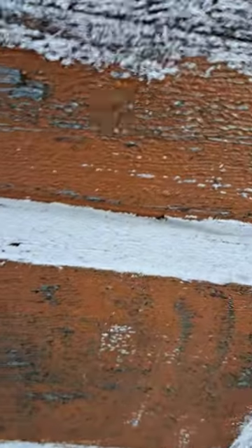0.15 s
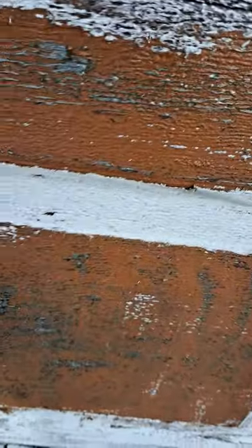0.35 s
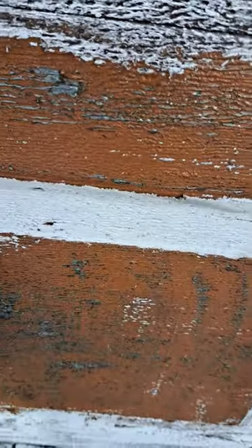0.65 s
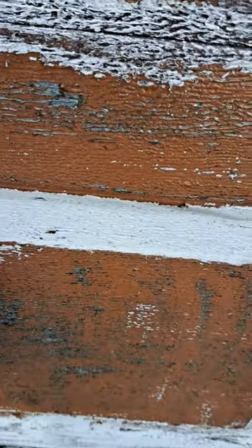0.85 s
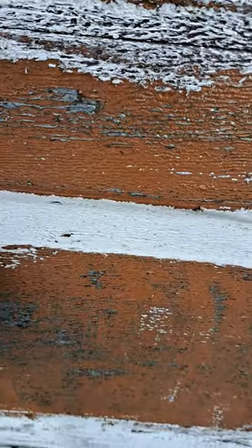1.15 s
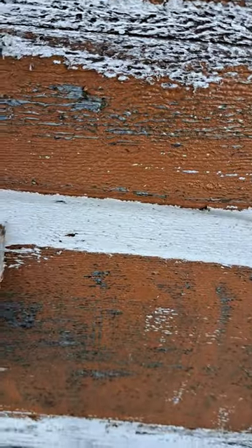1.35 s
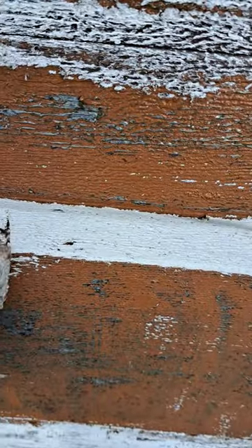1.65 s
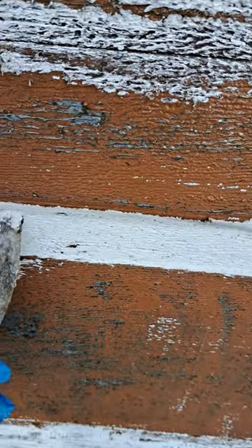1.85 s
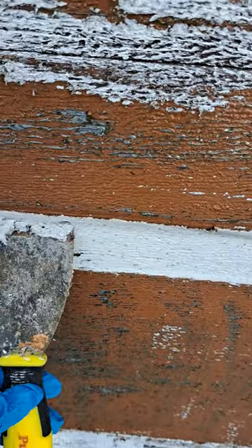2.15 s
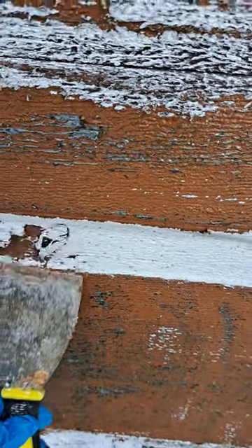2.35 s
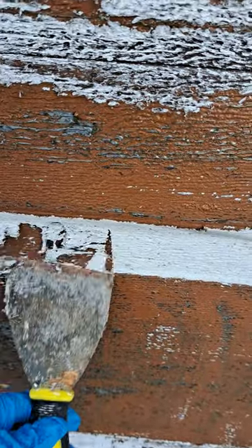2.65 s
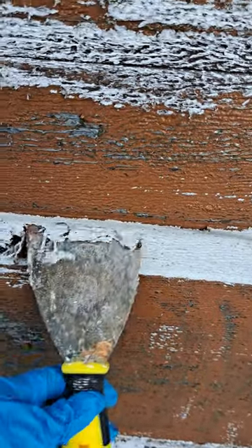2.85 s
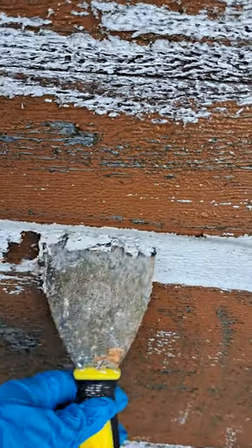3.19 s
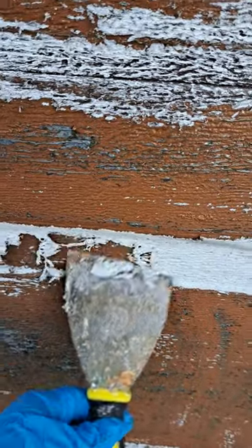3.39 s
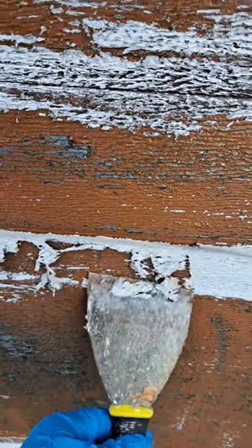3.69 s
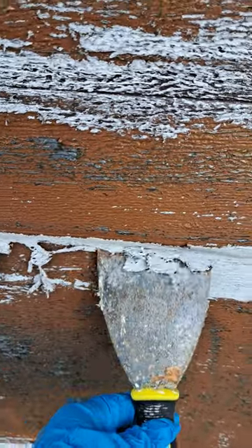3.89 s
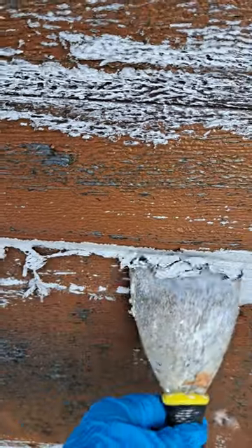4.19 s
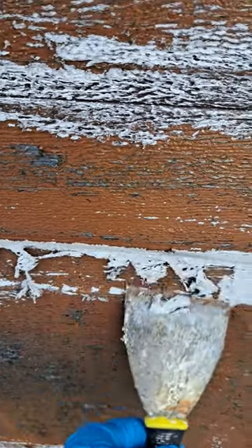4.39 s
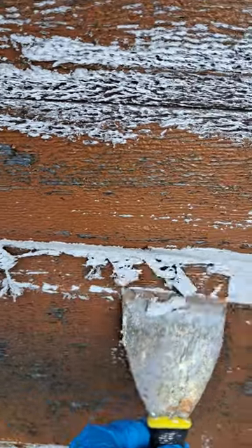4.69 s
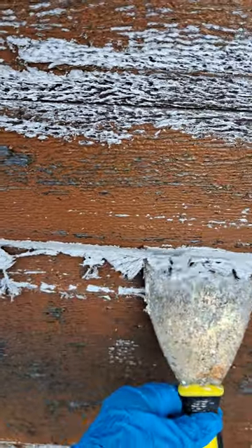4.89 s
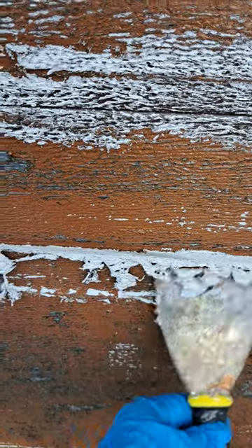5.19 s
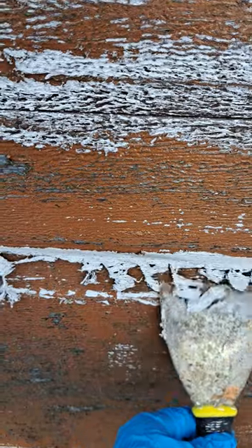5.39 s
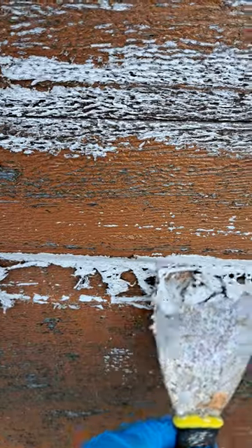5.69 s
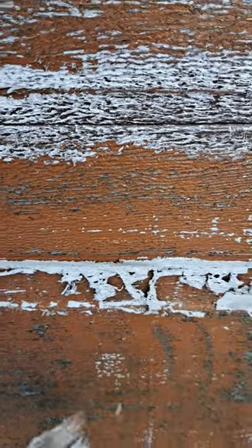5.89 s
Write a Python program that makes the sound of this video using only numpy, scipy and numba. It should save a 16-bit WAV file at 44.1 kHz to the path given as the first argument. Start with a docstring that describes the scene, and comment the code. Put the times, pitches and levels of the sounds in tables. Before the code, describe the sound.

Close scraping of dry flaking paint from a wooden door: short gritty pushes with hollow woody knocks, sharp cracks and faint metallic ring, over quiet outdoor hush.

```python
"""Scraping paint from a wooden door

A steel scraper, pushed in short strokes over flaking paint, is heard close to a two-port microphone.
Stick-slip clicks and knocks excite the damped modes of door panel and blade; the blade also sings faintly.
Grit, cracking flakes and tiny ticks are shaped noise; nearby walls return a short scatter of echoes.
Low noise swells after each push as a rumble, and a wavering noise forms the quiet outdoor hush."""
import sys
import numpy as np
from scipy import signal
from scipy.fft import rfft, irfft, next_fast_len
from scipy.io import wavfile
from scipy.ndimage import uniform_filter1d
from numba import njit

SR = 44100
rng = np.random.default_rng(int(sys.argv[2]) if len(sys.argv) > 2 else 0)


def bounce(signal):
    """Save signal as a 16-bit WAV file at the path given by the first command-line argument."""
    frames = np.transpose(np.atleast_2d(signal))
    limited = np.clip(frames, -1, 1)
    pcm = np.round(limited * 32767).astype(np.int16)
    wavfile.write(sys.argv[1], SR, pcm)


def elevation(decibels):
    """Turn decibel levels (scalar or array-like) into linear amplitude ratios."""
    levels = np.asarray(decibels, float)
    return 10 ** (levels / 20)


N = 266364   # length in samples

# Hush spectrum, relative density: f/Hz, level/dB (per Hz)
HUSH_SPECTRUM = [(24, 16), (40, 14), (124, -20), (293, -35), (510, -19), (1330, -20.5), (2090, -17),
                 (2900, -21), (6000, -23), (12800, -25), (15300, -24), (16500, -69)]
# Hush level in its 2.5-9 kHz band, before wavering: t/s, level/dB
HUSH_LEVEL = [(0.0, -58.5), (0.4, -55.5), (1.0, -53), (1.3, -44.5), (1.62, -55.5), (1.95, -48.5),
              (2.6, -56.5), (4.2, -57.5), (4.8, -51), (6.04, -52.5)]
# Rumble spectrum, relative density: f/Hz, level/dB (per Hz)
RUMBLE_SPECTRUM = [(13, -21), (24, 0), (54, 12.5), (86, 9), (124, 15), (172, 5), (250, 2), (320, -27),
                   (550, -120)]
# Rumble level, before the swell after each push: t/s, level/dB
RUMBLE_LEVEL = [(0.0, -50), (0.29, -64), (0.31, -36.5), (0.39, -47), (0.45, -25), (0.565, -36), (0.6, -30),
                (0.77, -25), (0.83, -41), (0.87, -80), (0.91, -25.5), (1.38, -41.5), (1.5, -25.5),
                (1.61, -51), (1.68, -33.5), (1.98, -38.5), (2.1, -61), (2.2, -27.5), (2.42, -72),
                (2.62, -42.5), (3.3, -29.5), (3.7, -29.5), (4.3, -33), (4.9, -23), (5.1, -34), (5.6, -35.5),
                (5.85, -32), (6.04, -50)]
SHAKE_DB, SHAKE_S = 7.5, 0.037   # swell of the rumble, and its delay after the stop of a push

TICKS_PER_S, TICK_DB = 20, -44   # mean rate and smallest size of the crumb ticks
# Faint rising blade notes, mostly between pushes, one in the last push:
# start t/s, length/s, starting f/Hz, rms level/dB
SINGING_NOTES = [(3.298, 0.084, 990, -47.5), (4.326, .055, 978, -50), (4.38, 0.053, 1160, -46.5),
                 (6.017, .03, 790, -36)]
SINGING_RISE_HZ_PER_S, SINGING_T60_S = 1000, 0.085
# Dry flakes: t/s, relative level/dB, main t60/s, left-right level/dB, centre f/Hz
FLAKES = [(0.1096, -15, 0.092, -8.5, 8800), (0.576, -28, 0.26, 1, 2500), (0.6986, -18.5, 0.015, -8, 6600),
          (0.771, -33, 0.028, -24, 3000), (0.9678, -6.5, 0.055, -7, 3370),
          (1.557, -24.5, 0.093, -2.5, 2500), (1.7398, -10, 0.053, -5, 3330), (1.827, -8, 0.023, -8, 3000),
          (2.025, -11.5, 0.019, -7, 3070), (2.126, -21.5, 0.042, -14, 3900),
          (2.186, -11, 0.056, -12.5, 4200), (2.396, -19.5, 0.061, -5, 2470), (2.528, -13, 0.049, -3, 3480),
          (2.842, -15, 0.083, 2, 5000), (2.858, -9.5, 0.03, 10, 2700), (3.162, -12.5, 0.06, 2, 4030),
          (3.174, -6.5, 0.03, 1, 3000), (3.6674, 9, 0.02, -1.5, 7570), (3.891, -23, 0.025, -15, 3000),
          (4.063, -25.5, 0.11, -3, 2520), (4.255, -12, 0.03, 3, 4200), (4.587, -11.5, 0.038, -5, 4130),
          (4.918, -18, 0.057, 8, 4160), (4.958, -28, 0.033, -27.5, 2600), (5.068, -24.5, 0.016, -9, 6360),
          (5.2956, 3.5, 0.017, -1, 2550), (5.3556, -19, 0.013, -14, 2420), (5.591, -2.5, 0.04, -4, 5170),
          (5.7305, -10.5, 0.06, -13, 5800), (5.7534, -7, 0.06, -3.5, 4270), (5.8443, -10, 0.059, -8, 3580)]
# Grit spectrum, relative density: f/Hz, level/dB (per Hz)
GRIT_SPECTRUM = [(1180, -24), (2000, -3), (2950, -16), (3220, -12), (4710, -14.5), (7520, -18),
                 (12500, -20), (15400, -17), (16100, -7), (16500, -46)]
GRIT_LEAN_DB = (2.5, -5.5, -1.4)   # left-right level of low, middle and high crumbs

# Forward pushes: stop t/s, length/s, then panel, blade and grit level/dB reached at the stop
PUSH_STROKES = [(1.087, 0.041, -18.5, -30, -36), (1.237, 0.021, -21, -50, -70),
                (1.778, 0.1, -24.5, -36, -40.5), (1.837, 0.03, -19, -27, -31.5),
                (2.195, 0.1, -23.5, -30.5, -38.5), (2.558, 0.13, -19.5, -33, -32.5),
                (2.862, 0.057, -16, -25.5, -33.5), (3.187, 0.049, -16.5, -21.5, -30.5),
                (3.472, 0.025, -25.5, -28.5, -38.5), (3.528, 0.033, -17, -14.5, -27),
                (3.899, 0.047, -14, -21.5, -28.5), (4.266, 0.074, -16, -20.5, -27.5),
                (4.59, 0.087, -17, -28.5, -31.5), (4.91, 0.061, -21, -27, -30),
                (5.299, 0.066, -15.5, -25, -33.5), (5.542, 0.096, -20, -42, -39.5),
                (5.596, 0.045, -19, -21.5, -34.5), (5.863, 0.14, -16, -22, -35.5),
                (6.03, 0.082, -21.5, -41, -46.5)]
BUILD_DB_PER_S = (154, 164, 133)   # growth during a push: panel, blade, grit
ONSET_DB_PER_S, RELEASE_DB_PER_S = (907.5, 913, 911), (298, 705, 810)   # before its start, after its stop
# Lighter drags: start t/s, length/s, then panel, blade and grit level/dB
PULL_STROKES = [(0.235, .05, -48.5, -71, -76), (0.44, 0.59, -70.5, -60, -57),
                (1.427, 0.061, -27, -42.5, -40), (1.993, 0.02, -32.5, -40, -45),
                (2.372, 0.011, -38, -52, -53), (2.625, 0.1, -34, -59, -50.5),
                (3.018, 0.0084, -30, -45, -43), (3.302, 0.077, -33.5, -44, -48),
                (3.69, 0.017, -37, -73, -45.5), (4.052, 0.032, -34, -46, -45.5),
                (4.416, 0.01, -30, -45.5, -41.5), (4.737, 0.013, -29, -38, -40),
                (5.136, 0.01, -32, -40.5, -46.5)]
PULL_RISE_DB_PER_S, PULL_FALL_DB_PER_S = (186, 226, 241), (322, 285, 329)
# Edge resting lightly between strokes: t/s, panel level/dB
RESTING = [(0.0, -59), (0.9, -54), (1.3, -48), (1.62, -54.5), (2.0, -45), (2.6, -48.5), (3.5, -41),
           (3.8, -49), (4.2, -40.5), (5.0, -50.5), (6.04, -51.5)]
REST_BLADE_DB, REST_GRIT_DB = -7.5, -30   # against the panel

# Edge knocks on wood: t/s, relative strength/dB, blade share/dB, favoured panel f/Hz
EDGE_KNOCKS = [(0.301, -20.5, -46, 107), (0.433, -28, -35, 123), (0.576, -21.5, -22, 111),
               (0.697, -27, -34, 150), (0.753, -25.5, -37, 164), (0.902, -8.5, -42, 136),
               (0.914, -8, -35, 165), (1.047, -11.5, -28, 208), (1.065, -12, -23, 260),
               (1.078, -9.5, -18, 287), (1.206, -5, -28, 156), (1.221, -5, -33, 169.5),
               (1.824, -1.5, -6, 384), (2.122, -20.5, 3, 540), (2.183, 1.5, -8.5, 320),
               (2.344, -22.5, -16, 270), (2.397, -15.5, -5.5, 275), (2.453, -16.5, -9.5, 308),
               (2.46, -17.5, -10, 380), (2.526, -8.5, -7.5, 340), (2.537, -7.5, -10.5, 308),
               (2.712, -24, -14, 277), (2.78, -30, -8, 296), (2.842, -9, -7, 314), (2.859, -2.5, -0.5, 294),
               (2.996, -33, 4, 690), (3.007, -19, -11, 764), (3.125, -18.5, -9, 230),
               (3.173, -4.5, -2, 467), (3.437, -9.5, -11.5, 340), (3.49, -9, -17, 377),
               (3.517, 5.5, -15.5, 288), (3.73, -20.5, -30, 377), (3.841, -36, -19, 287),
               (3.857, -24, -5, 285), (3.891, 5.5, -11.5, 279), (4.052, -30, -1, 310),
               (4.186, -14.5, -11.5, 217), (4.253, 5.5, -12, 300), (4.42, -20.5, -12, 322),
               (4.52, -16.5, -3.5, 294), (4.581, 0, -11, 331), (4.85, -15, -2, 363),
               (4.875, -17.5, -7, 380), (4.915, -17, -8, 200), (5.216, -19.5, -33, 330),
               (5.291, -2, -6.5, 278), (5.378, -20.5, -20, 275), (5.455, -17, -18, 202),
               (5.495, -11.5, -25, 420), (5.545, -9, -22, 353), (5.59, -5, -9, 296), (5.814, -15, -25, 350),
               (5.838, -11, -20, 440), (5.863, -10, -30, 395), (5.885, -22.5, -10, 430),
               (5.953, -15, -25, 176), (5.979, -18.5, -30, 366), (6.001, -22.5, -10, 424)]
KNOCK_SCATTER_DB = 3   # chance spread per mode
KNOCK_DELAY_S = .0025   # each knock starts this long after its listed time
SOFTER_IS_LONGER = .2   # dB of contact time gained per dB of weaker blow
# Path along the door: t/s, favoured panel f/Hz, favoured blade f/Hz,
# panel selectivity/(dB per octave above the favoured pitch)
PATH = [(0.0, 236, 1890, 0.5), (0.8, 224, 1850, 14.5), (1.15, 233, 1670, 22.5), (1.75, 326, 1680, 15.5),
        (2.45, 284, 1770, 9), (2.8, 307, 1530, 11.5), (3.4, 376, 1690, 21.5), (3.55, 300, 1340, 12.5),
        (4.0, 303, 1300, 17), (4.55, 287, 1620, 11.5), (4.85, 369, 1330, 31), (5.1, 350, 1270, 27),
        (5.35, 268, 1370, 27), (5.5, 440, 1320, 34), (5.7, 374, 1420, 25), (5.85, 395, 1280, 65),
        (5.96, 340, 1390, 37), (6.04, 446, 1130, 39)]
UPPER_PARTNER, UPPER_PARTNER_DB = 2.014, -14   # frequency ratio and level of a second favoured pitch
# Steel blade modes: f/Hz, relative level/dB, t60/s
BLADE_MODES = [(1051, 12, 0.064), (1193, 19.5, 0.03), (1393, 3.5, 0.016), (1525, 14.5, 0.012),
               (1633, 20, 0.012), (1827, 13.5, 0.031), (2116, 15.5, 0.019), (2545, 5, 0.049),
               (2700, 2.5, 0.033)]
# Door panel modes: f/Hz, relative level/dB
PANEL_MODES = [(95, 6.5), (125, 6.5), (165, 0), (205, 2), (236, -3.5), (275, 0.5), (315, -2.5), (350, -10),
               (390, -5), (430, -5.5), (475, -5.5), (520, -12), (565, -2.5), (620, 2), (675, -3), (720, -2),
               (765, 0), (820, -45.5), (880, -17), (950, 3)]
WOOD_T60_S_AT_100_HZ = 0.19   # at the reference selectivity; falls as the root of the pitch
RING_DB_PER_SELECTIVITY_DB, REFERENCE_SELECTIVITY_DB = -0.01, 30   # selective spots ring shorter
PANEL_WANDER, BLADE_WANDER = .04, .03   # rms share by which each mode's pitch wanders slowly at random

# Balance of the modes between the ports: f/Hz, left-right level/dB
PORT_BALANCE = [(60, -3), (110, 0), (270, 1.5), (450, -3), (740, -4.5), (1220, 1), (2010, -11.5), (3330, 0)]
PORT_LAG_S = .0001   # delay of shared sound at the right port
ECHO_DB, ECHO_T60_S = -13, 0.047
# Microphone response: f/Hz, level/dB
MICROPHONE_RESPONSE = [(20, -45), (45, 3), (5000, -2), (8000, -7), (9200, -12.5), (10500, -7.5),
                       (13000, -4.5), (16000, -16)]
GAIN_KNEE_DB, GAIN_CUT, GAIN_RECOVERY_DB_PER_S = -15, 0.35, 123   # cut: share of the excess over the knee


def rms_one(x):
    """Normalization: scale to unit rms."""
    return x / np.sqrt(np.mean(x ** 2) + 1e-20)


def in_time(rows):
    """Linear interpolation: the columns of a curve table at every sample."""
    s, *columns = np.transpose(rows)
    return [np.interp(np.arange(N) / SR, s, c) for c in columns]


def at_hz(points, hz):
    """Interpolation of a spectrum table on a logarithmic frequency axis."""
    table_hz, level_db = np.transpose(points)
    return np.interp(np.log(np.maximum(hz, 1)), np.log(table_hz), level_db)


def coloured(x, points):
    """Linear filtering: multiply the Fourier spectrum by a table of levels."""
    size = next_fast_len(N)
    gain = elevation(at_hz(points, np.fft.rfftfreq(size, 1 / SR)))
    return irfft(rfft(x, size) * gain, size)[..., :N]


def bandpass(x, order, low_hz, high_hz):
    """Butterworth filtering between two frequencies."""
    return signal.sosfilt(signal.butter(order, [low_hz, high_hz], "band", fs=SR, output="sos"), x)


def drift(rate):
    """Low-passed chance: unit-rms noise with a corner rate in Hz, made at every 40th sample."""
    r = np.exp(-80 * np.pi * rate / SR)
    white = rng.standard_normal(N // 40 + 2002)
    slow = signal.lfilter([1], [1, -2 * r, r * r], white)[2000:]   # settled part only
    return np.interp(np.arange(N) / 40, np.arange(len(slow)), rms_one(slow))


def two_ports(x, alike):
    """Partial coherence: the right port has a delayed share of the left sound and a second part."""
    shared, own = x
    late = np.interp(np.arange(N) - PORT_LAG_S * SR, np.arange(N), shared)
    return np.array([shared, alike * late + np.sqrt(1 - alike ** 2) * own])


@njit
def resonate(force, r, cos_w, sin_w):
    """Damped oscillator: a two-pole recursion whose pitch and damping may move at each sample."""
    out = np.zeros(len(force))
    for i in range(2, len(force)):
        out[i] = sin_w[i] * force[i - 1] + 2 * r[i] * cos_w[i] * out[i - 1] - r[i] * r[i] * out[i - 2]
    return out


def ring(force, hz, t60):
    """Impulse response: a unit click starts a decaying sine of height 1; hz and t60 per sample."""
    w = 2 * np.pi * hz / SR
    return resonate(force + 1e-18, elevation(-60 / (t60 * SR)), np.cos(w), np.sin(w))


def judder(per_s, spread_db):
    """Stick-slip: random clicks of uneven size and sign, coming in clumps, at unit rms."""
    sizes = elevation(spread_db * np.minimum(rng.exponential(1, N), 4)) * rng.choice([-1, 1], N)
    draw = rng.random(N)
    return rms_one(sizes * (draw < per_s * elevation(3.0 * drift(25)) / SR))


def after_stop(seconds):
    """Critically damped response: a bump of about 1, peaking this long after the latest stop."""
    stops, t = np.array([row[0] for row in PUSH_STROKES]), np.arange(N) / SR
    since = (t - np.r_[-10, stops][np.searchsorted(stops, t)]) / seconds
    return uniform_filter1d(since * np.exp(1 - since), size=441)


def hush():
    """Diffuse field: outdoor noise, nearly incoherent between the ports, wavering in level."""
    far = coloured(two_ports(rng.standard_normal((2, N)), alike=0.043), HUSH_SPECTRUM)
    waver_db = 2.8 * drift(8)
    return elevation(in_time(HUSH_LEVEL)[0] + waver_db) * far / np.std(bandpass(far, 2, 2500, 9000))


def rumble():
    """Modulated noise: lumpy low noise, mostly incoherent, swelling after each push."""
    lumps = two_ports(rng.standard_normal((2, N)), alike=.2) * elevation(4.4 * drift(3.3))
    unit = np.std(coloured(lumps, RUMBLE_SPECTRUM))
    level_db = in_time(RUMBLE_LEVEL)[0] + SHAKE_DB * after_stop(SHAKE_S)
    return coloured(lumps * elevation(level_db), RUMBLE_SPECTRUM) / unit


def nearby_walls(x):
    """Early reverberation: convolution with a short dull noise decay, different in each port."""
    t = np.arange(int(.3 * SR)) / SR
    tail = rng.standard_normal((2, len(t))) * elevation(-60 * t / ECHO_T60_S) * (t > .003)
    tail = signal.lfilter([.4], [1, -.6], tail)
    tail /= np.sqrt(np.sum(tail ** 2, axis=1, keepdims=True))
    return elevation(ECHO_DB) * signal.fftconvolve(x.mean(axis=0, keepdims=True), tail, axes=1)[:, :N]


def ticks():
    """Poisson events: single crumbs snap as short noise puffs, each in one of four octave bands."""
    born = rng.random(N) < TICKS_PER_S / SR
    sizes = elevation(TICK_DB + 6.2 * np.minimum(rng.exponential(1, N), 2))
    dealt, noise, out = rng.integers(0, 4, N), rng.standard_normal(N), 0
    decay = float(elevation(-60 / (0.011 * SR)))   # t60 of 11 ms
    for k, hz in enumerate(np.geomspace(2500, 7500, 4)):
        puffs = signal.lfilter([1], [1, -decay], born * sizes * (dealt == k) + 1e-18)
        out = out + bandpass(puffs * noise, 1, hz, 2 * hz)
    return two_ports([out, out], alike=0.93)


def singing():
    """Friction-driven resonance: noise through one narrow blade mode whose pitch creeps upward."""
    t, out, noise = np.arange(N) / SR, np.zeros(N), rng.standard_normal(N)
    for s, length, hz, db in SINGING_NOTES:
        near = slice(int(s * SR), int((s + length + SINGING_T60_S) * SR))
        since = t[near] - s
        force = noise[near] * np.sqrt(np.sin(np.pi * np.clip(since / length, 0, 1)) + 1e-12)
        note = ring(force, hz + SINGING_RISE_HZ_PER_S * since, np.full(len(since), SINGING_T60_S))
        out[near] += elevation(db) * rms_one(note)
    return two_ports([out, out], alike=0.97) * elevation([[-2.0], [2.0]])


def cracks():
    """Brittle fracture: each flake is a sharp-fronted noise burst with its own colour and a faint tail."""
    out, t = np.zeros((2, N)), np.arange(int(.25 * SR)) / SR
    noise = two_ports(rng.standard_normal((2, N)), alike=0.49)
    for s, db, t60, pan_db, centre_hz in FLAKES:
        start = round(s * SR)
        decay = elevation(-60 * t / t60) + elevation(-25.0) * elevation(-60 * t / 0.13)
        shape = (1 - np.exp(-t / 0.000043)) * decay
        burst = noise[:, start:start + len(t)]
        peak = bandpass(burst, 2, 0.86 * centre_hz, 1.175 * centre_hz)
        broad = signal.sosfilt(signal.butter(3, 1300, "high", fs=SR, output="sos"), burst)
        dull_hz = min(2.75 * centre_hz, 15000)   # duller well above the centre
        broad = broad - 0.5 * signal.sosfilt(signal.butter(1, dull_hz, "high", fs=SR, output="sos"), broad)
        lean_db = pan_db * np.array([[.5], [-.5]])
        sound = 0.78 * peak * elevation(lean_db) + 0.5 * broad * elevation(1.1 * lean_db)   # broad part leans more
        out[:, start:start + len(t)] += elevation(db - 3.0) * sound * shape[:burst.shape[1]]
    return out


def pressure(layer):
    """Power summation: drive in dB of panel (0), blade (1) or grit (2) from pushes, drags and rest."""
    t = np.arange(N) / SR
    power = elevation(in_time(RESTING)[0] + (0, REST_BLADE_DB, REST_GRIT_DB)[layer]) ** 2
    drags = [(s + length, length, *db) for s, length, *db in PULL_STROKES]
    strokes = ((PUSH_STROKES, BUILD_DB_PER_S[layer], ONSET_DB_PER_S, RELEASE_DB_PER_S),
               (drags, 0, PULL_RISE_DB_PER_S, PULL_FALL_DB_PER_S))
    for rows, growth, rise, fall in strokes:
        for stop, length, *db in rows:
            start = stop - length
            near = slice(max(int((start - .3) * SR), 0), int((stop + .3) * SR))
            build = growth * np.clip(stop - t[near], 0, length)
            before, after = np.maximum(start - t[near], 0), np.maximum(t[near] - stop, 0)
            power[near] += elevation(db[layer] - build - rise[layer] * before - fall[layer] * after) ** 2
    return 10 * np.log10(power)


def grit():
    """Granular noise: crumbs ground under the edge; three bands flicker together and on their own."""
    grains = np.array([judder(2300, 4.7) + 0.8 * judder(350, 3.5) + 1.4 * rng.standard_normal(N)
                       for port in range(2)])   # dense grains, sparser snaps, hiss
    flicker_db = 3.4 * drift(78)
    crumbs = rms_one(coloured(two_ports(grains, alike=0.28), GRIT_SPECTRUM))
    low, below_high = (signal.sosfilt(signal.butter(2, hz, fs=SR, output="sos"), crumbs)
                       for hz in (3500, 7500))
    out = 0
    for band, pan_db in zip((low, below_high - low, crumbs - below_high), GRIT_LEAN_DB):
        out = out + band * elevation(4.0 * drift(38) + pan_db * np.array([[.5], [-.5]]))
    return elevation(pressure(2) + flicker_db) * out


def favour(modes, centre_hz, db_per_octave, upper_db):
    """Selective coupling: modes off the favoured pitch or its partner get less; total power stays."""
    hz, db, t60 = np.array(modes).T[:, :, None]
    octaves = np.log2(hz / centre_hz)
    drive = elevation(-db_per_octave * np.maximum(octaves, -1.55 * octaves))   # steeper below the pitch
    drive = drive + elevation(upper_db - 1.6 * db_per_octave * np.abs(octaves - np.log2(UPPER_PARTNER)))
    power = np.sum((drive * elevation(db)) ** 2 * t60, axis=0)
    return drive / np.sqrt(power / np.sum(elevation(db) ** 2 * t60))


def knocks(modes, peak_db, spot_hz, contact_s, narrow_db, chatter, upper_db=-60):
    """Impact: a rounded push and recoil per knock forces each mode; three weaker rebounds follow."""
    force, t = np.zeros((len(modes), N)), np.arange(int(.02 * SR)) / SR
    drive = favour(modes, spot_hz, narrow_db, upper_db).T
    scatter = elevation(KNOCK_SCATTER_DB * rng.standard_normal(drive.shape))
    rebounds = rng.random((len(EDGE_KNOCKS), 3, 2))
    for k, row in enumerate(EDGE_KNOCKS):
        delays = np.r_[0, .002 + .009 * rebounds[k, :, 0]]
        sizes = np.r_[1, chatter * (2 * rebounds[k, :, 1] - 1)]   # rebounds of either sign
        since = np.maximum(t - delays[:, None], 0) / contact_s[k]
        push = sizes @ (since * (2 - since) * np.exp(-since)) / (contact_s[k] * SR)
        start = round((row[0] + KNOCK_DELAY_S) * SR)
        force[:, start:start + len(t)] += np.outer(elevation(peak_db[k]) * drive[k] * scatter[k], push)
    return force


def body(modes, level_db, centre_hz, slips, struck, narrow_db, patchy_db, turn, wander, lasting,
         upper_db=-60):
    """Modal superposition: slips and knocks drive each mode, with its own balance and lag at the ports."""
    out, phases = np.zeros((2, N)), rng.random(len(modes))
    drive = favour(modes, centre_hz[::64], narrow_db[::64], upper_db)
    drive = np.repeat(drive, 64, axis=1)[:, :N]
    # a steady force of rms 1 on all modes would sound at this rms
    unit = np.sqrt(sum(elevation(db) ** 2 * t60 * SR / (12 * np.log(10)) for hz, db, t60 in modes))
    steady = elevation(level_db) / unit / np.sqrt(lasting)
    for k, (hz, db, t60) in enumerate(modes):
        patchy = elevation(patchy_db * drift(3.0))   # each mode's drive wavers slowly at random
        force = (-1) ** k * slips[k % 2] * steady * drive[k] * patchy + struck[k]
        tone = elevation(db) * ring(force, hz * (1 + wander * drift(2.97)), t60 * lasting)
        lag = PORT_LAG_S * SR + turn * phases[k] * SR / (2 * np.pi * hz)
        late = np.interp(np.arange(N) - lag, np.arange(N), tone)
        lean_db = at_hz(PORT_BALANCE, hz)
        out += np.array([tone * elevation(lean_db / 2), late * elevation(-lean_db / 2)])
    return out


def clinks():
    """Short impact: very brief contacts force the blade modes, neighbours starting opposite ways."""
    s, peak_db, share_db, spot_hz = np.transpose(EDGE_KNOCKS)
    blade_hz = in_time(PATH)[1][(s * SR).astype(int)]
    force = knocks(BLADE_MODES, peak_db + share_db - 14.5, blade_hz,
                   contact_s=.00004 * elevation(-SOFTER_IS_LONGER * peak_db), narrow_db=8.0, chatter=0.63)
    force[::2] *= -1
    return force


def blade(struck):
    """Forced vibration of steel: stick-slip and the clinks ring the blade modes."""
    return body(BLADE_MODES, pressure(1), in_time(PATH)[1], [judder(450, 2.34), judder(500, 4.5)], struck,
                narrow_db=np.full(N, 10.5), patchy_db=5.0, turn=1.31, wander=BLADE_WANDER, lasting=np.ones(N))


def wood_modes():
    """Modal damping: the higher panel modes die sooner."""
    return [(hz, db, WOOD_T60_S_AT_100_HZ * np.sqrt(100 / hz)) for hz, db in PANEL_MODES]


def thuds():
    """Soft impact: longer contacts push the panel as a whole."""
    s, peak_db, share_db, spot_hz = np.transpose(EDGE_KNOCKS)
    # a deep spot is a soft one: the contact lasts longer
    contact_s = 0.056 / spot_hz * elevation(-SOFTER_IS_LONGER * peak_db)
    narrow_db = 4.5 + 0.95 * in_time(PATH)[2][(s * SR).astype(int)]
    return -knocks(wood_modes(), peak_db - 14.5, spot_hz, contact_s, narrow_db, chatter=0.51,
                   upper_db=UPPER_PARTNER_DB)


def panel(struck):
    """Forced vibration of wood: stick-slip and the thuds ring the door modes."""
    panel_hz, blade_hz, narrow_db = in_time(PATH)
    lasting = elevation(RING_DB_PER_SELECTIVITY_DB * (narrow_db - REFERENCE_SELECTIVITY_DB))
    return body(wood_modes(), pressure(0), panel_hz, [judder(400, 4.8), judder(400, 2.64)], struck,
                narrow_db, patchy_db=3.0, turn=0.29, wander=PANEL_WANDER, lasting=lasting,
                upper_db=UPPER_PARTNER_DB)


def scene():
    """Superposition: scraper and door with their echoes, over rumble and hush."""
    on_panel, on_blade = thuds(), clinks()
    near = panel(on_panel) + blade(on_blade) + grit() + cracks() + singing() + ticks()
    return near + nearby_walls(near) + rumble() + hush()


def gain_control(x):
    """Level compression: loud sound pulls the gain down within milliseconds; it recovers steadily."""
    level_db = 10 * np.log10(uniform_filter1d(np.mean(x ** 2, axis=0), size=221) + 1e-12)
    ramp = GAIN_RECOVERY_DB_PER_S * np.arange(N) / SR
    wanted_db = GAIN_CUT * np.maximum(level_db - GAIN_KNEE_DB, 0)
    cut_db = np.maximum.accumulate(wanted_db + ramp) - ramp
    r = np.exp(-1 / (0.011 * SR))   # 11 ms smoothing
    return x * elevation(-signal.lfilter([1 - r], [1, -r], cut_db))


def low_pass(x):
    """Removes everything above the highest recorded frequency."""
    return signal.sosfilt(signal.butter(12, 16790, fs=SR, output="sos"), x)


def record(dry):
    """Transduction: microphone response, gain control, then saturation that rounds the loudest peaks."""
    levelled = gain_control(coloured(dry, MICROPHONE_RESPONSE))
    finished = 0.98 * np.tanh(levelled / 1.405)
    return low_pass(finished)


dry = scene()
out = record(dry)
bounce(out)
```